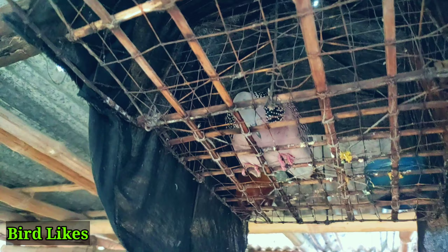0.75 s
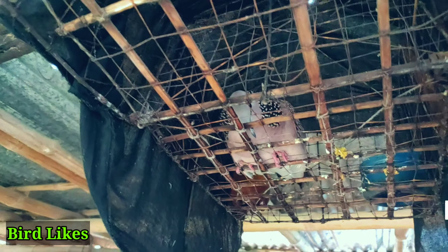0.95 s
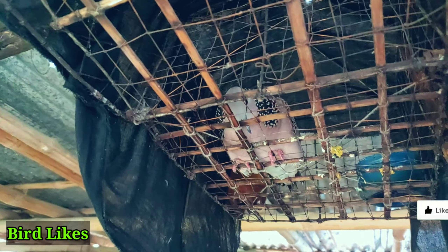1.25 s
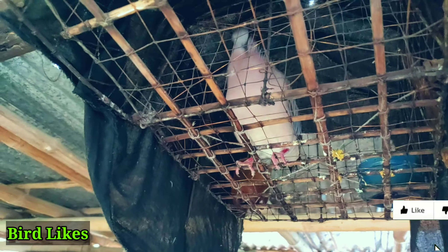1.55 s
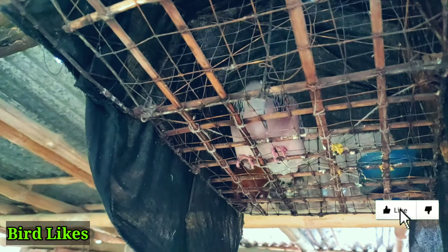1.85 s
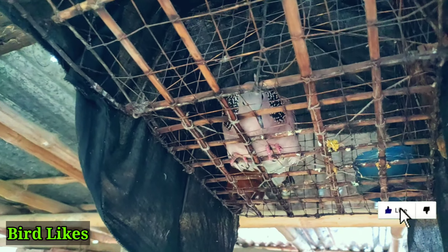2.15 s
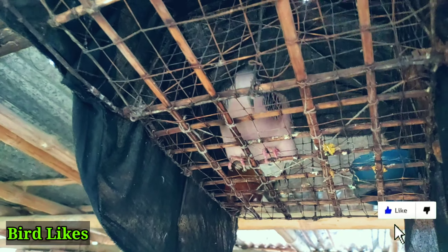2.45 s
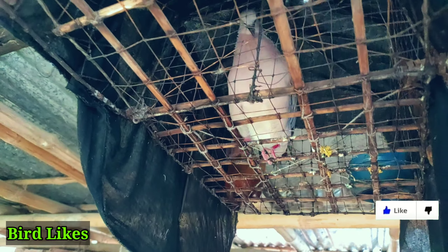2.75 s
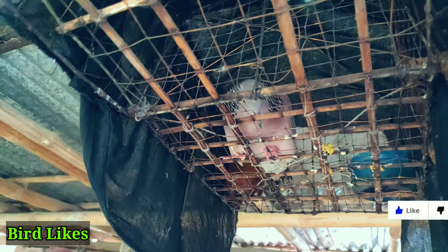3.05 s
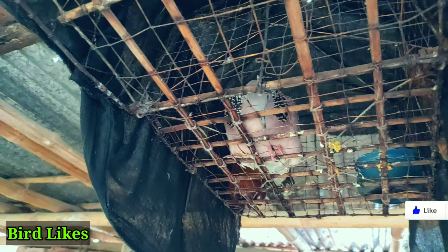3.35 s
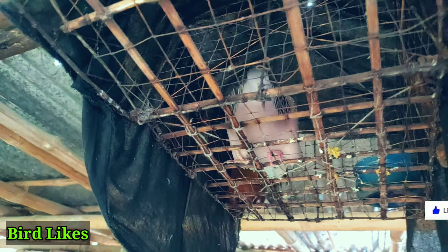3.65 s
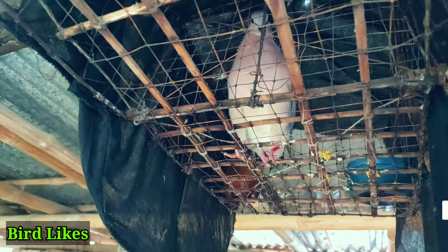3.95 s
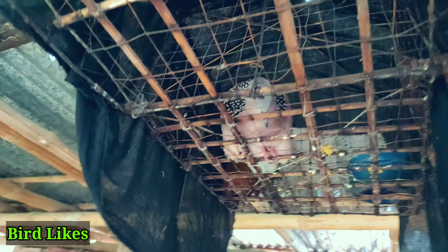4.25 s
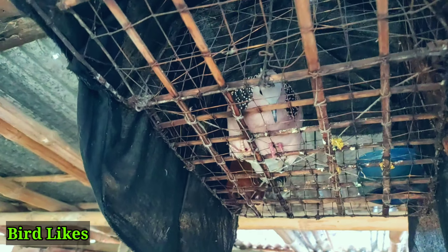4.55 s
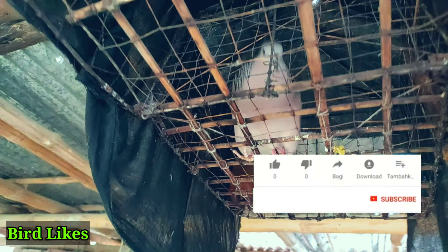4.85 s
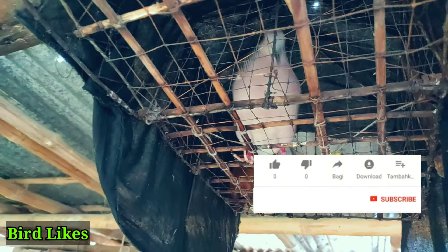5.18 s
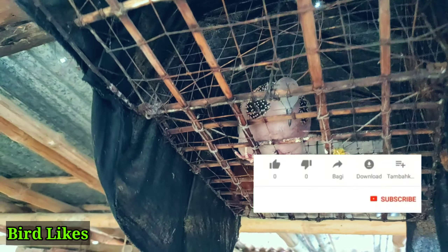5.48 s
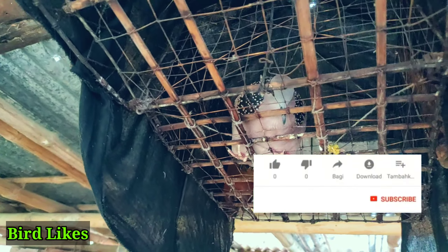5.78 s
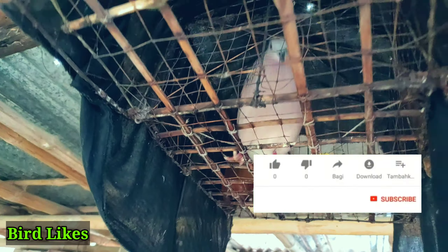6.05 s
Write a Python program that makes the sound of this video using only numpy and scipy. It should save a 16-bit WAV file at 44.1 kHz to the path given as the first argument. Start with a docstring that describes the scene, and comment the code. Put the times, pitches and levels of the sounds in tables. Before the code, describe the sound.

Close, rolling dove coos repeat in a quiet shed while small birds shrill faintly and another dove answers with a throbbing call.

```python
"""Under a shed roof, a caged dove coos seven times, very close. A coo is a rolled "krr", a pulse train
that swells until it overloads the microphone, then a smooth tone that sinks and drops away; the first
is already under way. A second dove answers softly, then with a throbbing, amplitude-modulated call.
Small birds shrill further off, feathers rustle and a mouse button clicks. Roof and walls add
reverberation, and a noise gate lowers the hiss between the coos."""
import sys
import numpy as np
from scipy import signal
from scipy.fft import rfft, irfft, next_fast_len
from scipy.io import wavfile
from scipy.ndimage import uniform_filter1d, minimum_filter1d

SR = 44100
rng = np.random.default_rng(int(sys.argv[2]) if len(sys.argv) > 2 else 0)


def store_pcm(level_fs):
    """Save levels as 16-bit WAV."""
    pcm = np.round(np.clip(level_fs, -1, 1) * 32767).astype(np.int16)
    wavfile.write(sys.argv[1], SR, np.atleast_2d(pcm).T)


N = 353682
TIME = np.arange(N) / SR

# Coos, with delays counted from each start:
# (start [s], first pulse [s], breath eases [s], air runs out [s], level of the soft ending [dB])
COOS = [(-.42, 0.023, 0.52, .722, -22), (.735, 0.033, .55, 0.74, -20.5), (1.892, 0.024, 0.57, 0.71, -18.5),
        (3.067, 0.022, .565, 0.7, -17.5), (4.219, .029, .545, .69, -16), (5.368, 0.018, 0.55, 0.68, -17.5),
        (6.531, .021, .54, 0.67, -16)]
# The opening roll, a push, a lull and a long swell: (delay [s], tone level [dB], pulse crest [dB])
ROLL = [(0, -19.5, -14), (.022, -12.5, -5.5), (.042, -26, -1), (.06, -33.5, -4.5), (.09, -34.5, -16),
        (.135, -36, -20), (.2, -25, -2), (.24, -25, -1), (.275, -10, -1), (.33, -8, -0.5)]
# Strongest pulses, at the climax of the rolls: (time [s], crest [dB])
SURGES = [(0.985, 0), (1.03, 1.5), (1.076, 2.03), (1.11, -0.3), (2.133, 0.57), (2.176, 0.93), (2.213, 2.4),
          (2.238, 0.6), (3.362, 2.1), (3.39, 1.9), (4.5, 1.26), (4.536, 0.83), (4.572, -0.1), (5.636, 0.8),
          (5.677, 0.48), (5.729, 1.56), (6.795, -0.4), (6.884, -0.4)]
# Partials of the coo: (pitch multiple, flutter multiple, level re full voice [dB], growth [dB/dB])
PARTIALS = [(1, 1, -22.5, 0.56), (1, 2, -41, -0.45), (0, 1, -51.5, .4), (0, 2, -58.5, -0.5),
            (2, 0, -33, .15), (2, -1, -48, -0.096), (3, 0, -65, -1), (4, 0, -59, -0.33),
            (9, 0, -68.5, 0.23), (11, 0, -70, 0.38)]
# Husky noise in the throat: (frequency [Hz], relative level [dB])
RASP_SPECTRUM = [(30, -31.5), (120, -18.5), (280, -13.5), (420, 3), (560, 0.5), (700, 11), (820, 4),
                 (950, -11), (1100, -8.5), (1400, -24), (5000, -40.5), (8000, -47.5), (12000, -59.5)]
# The second dove's loud call: (time [s], pitch [Hz], undertone level [dB])
ANSWER = [(7.0, 663, -38), (7.07, 662.5, -16), (7.15, 679.6, -29.5), (7.25, 677.6, -20.5),
          (7.55, 695.6, -27.5), (7.75, 680, -25.5), (7.95, 662.4, -27.5), (8.02, 659, -33.5)]
# Its soft far calls: (start [s], duration [s], first pitch [Hz], target pitch [Hz], level [dB])
FAR_NOTES = [(4.153, 0.15, 621.7, 620, -43), (5.012, 0.5, 680, 852, -37.5),
             (6.038, 0.51, 681.6, 722, -33.5), (6.43, 0.15, 692.6, 643, -35.5)]
# Small birds: (start [s], duration [s], first pitch [Hz], last pitch [Hz], bandwidth [Hz], level [dB])
SHRILLS = [(0.129, 0.23, 3250, 2634, 480, -42.5), (0.549, 0.36, 3300, 3476, 441, -42.5),
           (0.879, 0.33, 3150, 3572, 509, -39.5), (1.061, 0.22, 3500, 3840, 514, -41.5),
           (1.313, 0.37, 3350, 3527, 362, -37), (1.845, 0.32, 2680, 2554, 60, -55.5),
           (2.046, 0.095, 3000, 3030, 80, -60), (2.573, 0.2, 2640, 2540, 140.8, -54.5),
           (3.57, .14, 3250, 2820, 304, -56.5), (4.157, 0.17, 2280, 1992, 307, -49.5),
           (4.314, 0.19, 2440, 2457, 79, -56.5), (4.507, .11, 2700, 2894, 199.3, -52),
           (4.664, 0.11, 2700, 3000, 290, -53), (5.95, .07, 3410, 3300, 695.4, -49.5),
           (7.162, 0.078, 3177, 3055, 814, -52)]
# Feather strokes: (start [s], duration [s], level [dB])
RUSTLES = [(2.903, 0.14, -41.5), (3.52, 0.042, -57.5), (4.735, 0.044, -56), (5.954, 0.039, -44.5),
           (7.305, 1, -64.5)]
# Feather friction: (frequency [Hz], relative level [dB])
RUSTLE_SPECTRUM = [(180, -50), (300, -18), (396, -9.5), (539, -28.5), (574, -3), (723, -9.5), (1560, -9),
                   (3600, -3), (5900, -12.5), (12000, -60), (15600, -91), (22000, -120)]
# Mouse button, down and up: (start [s], duration [s], level [dB])
CLICKS = [(2.282, 0.0058, -27.5), (2.3657, 0.0069, -27.5)]
# The button's snap: (frequency [Hz], relative level [dB])
CLICK_SPECTRUM = [(1200, -32), (2000, -1), (4000, -1.5), (6000, 4.5), (8500, 3), (11000, -9.5), (15500, -9)]
# Faint drone near the end: (start [s], duration [s], pitch [Hz], level [dB])
DRONES = [(7.595, 0.19, 235, -51.5), (7.801, 0.18, 184, -43)]
# Ambient noise of the shed: (frequency [Hz], relative level [dB])
AIR_SPECTRUM = [(25, -34), (55, -21.5), (85, -4), (115, 2.5), (160, -2.5), (300, -9.5), (700, -10),
                (1300, -16.5), (2000, -20), (3400, -22.5), (5800, -25), (8000, -31), (12000, -41.5),
                (16000, -50)]


def dove(full_db=-9, flutter_hz=129, flutter_spread_hz=12, waver=.0016, blur_rad=.043):
    """Modulation: a nearly pure voice with faint flutter sidebands, husky in the roll and at low pitch."""
    hz, tone_db, crest_db = coo_contours()
    phase = phase_of(hz * (1 + waver * drift(31)))
    flutter = phase_of(flutter_hz + flutter_spread_hz * drift(27))
    build_up = np.hanning(SR // 200)   # the voice takes a couple of cycles to build up
    envelope = np.sqrt(2) * np.convolve(from_db(tone_db), build_up / build_up.sum(), "same")
    # partials stand out fully only where the steady tone has taken over from the pulses
    clarity = np.clip(envelope / from_db(np.maximum(crest_db - 1.5, -27)), 0, 1) ** 2
    clarity = np.maximum(clarity, .33 * np.clip(envelope / from_db(-18), 0, 1))
    voice = envelope * np.cos(phase)
    for harmonic, sideband, db, growth in PARTIALS:
        level = from_db(full_db + db + growth * (tone_db - full_db) + (1 + .5 * harmonic) * drift(7.6))
        partial_phase = harmonic * (phase + blur_rad * drift(38)) + sideband * flutter
        voice += np.sqrt(2) * clarity * level * np.cos(partial_phase)
    pulses = roll(hz, phase, envelope, crest_db)
    pulse_power = np.abs(uniform_filter1d(pulses ** 2, SR // 100))
    # the rasp follows the pulse power and rises where the pitch is low
    slack = np.clip((470 - hz) / 70, 0, 1) * np.clip(envelope / from_db(-41.5), 0, 1)
    rasp = (from_db(-28) * pulse_power ** (1 / 4) + from_db(-39) * slack) * noise(RASP_SPECTRUM)
    octave = from_db(-44) * high_pass(pulses ** 2, 700)
    return breath_limit(voice + pulses + rasp) + octave


def coo_contours(roll_hz=576.4, hz_per_db=7, drop_s=.028, drop_hz=85, drop_db=7):
    """Pitch follows effort and drops as the air runs out: curves of pitch, tone level and pulse crest."""
    tone, crests = [], []
    rolled = [(s, roll_hz + hz_per_db * crest, level) for s, level, crest in ROLL]
    onset = [(-.003, rolled[0][1], -88.5)]
    for start, _, ease_s, end_s, soft_db in COOS:
        held = held_tone(ease_s, end_s, soft_db)
        end, hz, db = held[-1]
        drop = [(end + drop_s / 2, hz - drop_hz / 3, db - drop_db / 3),
                (end + drop_s, hz - drop_hz, db - drop_db),
                (end + 2 * drop_s, hz - 2 * drop_hz, -90)]
        tone += [(start + s, pitch, level) for s, pitch, level in onset + rolled + held + drop]
        crests += [(start + s, crest) for s, _, crest in ROLL] + [(start + .5, -60), (start + 1, -60)]
    return curves(tone) + curves(crests)


def held_tone(ease_s, end_s, soft_db, from_s=.37, held_hz=542.6, held_db=-9.5, step_s=.06):
    """Exponential decay, stepping down as the breath eases: (delay [s], pitch [Hz], level [dB])."""
    slow_db_per_s, fast_db_per_s, sag_hz_per_s, hz_per_db = 17, 42, 75, 3.5
    s = np.array([from_s, ease_s, ease_s + step_s, end_s])
    db = np.array([held_db, held_db - slow_db_per_s * (s[1] - s[0]),
                   soft_db, soft_db - fast_db_per_s * (s[3] - s[2])])
    hz = held_hz - sag_hz_per_s * (s - from_s) + hz_per_db * (db - held_db)
    return list(zip(s, hz, db))


def roll(hz, phase, envelope, crest_db, rise_s=.0034, fall_s=.0055, slip_rad=1.6, choke=.45):
    """Phase locking: pulses start sharp and sag in pitch, and lock to the tone once it is strong."""
    lift_hz, push_hz, scatter_hz, sag_hz_per_s, lock_share = 35, 135, 22, 8500, .36
    out = np.zeros(N)
    for s, db in roll_pulses(crest_db):
        i, centre = near(s, .02), int(s * SR)
        t = TIME[i] - s
        tone_share = min(envelope[centre] / from_db(db), 1)
        pulse_hz = hz[centre] + lift_hz + push_hz * tone_share + scatter_hz * rng.standard_normal()
        chirp = 2 * np.pi * (pulse_hz - sag_hz_per_s * t / 2) * t
        offset = phase[centre] + slip_rad * max(1 - tone_share / lock_share, 0) * rng.standard_normal()
        window = np.exp(-(t / np.where(t < 0, rise_s, fall_s)) ** 2)
        out[i] += from_db(db) * (1 - tone_share) * window * np.cos(chirp + offset)
        # the tone is choked for an instant just ahead of the pulse
        out[i] -= choke * envelope[i] * np.exp(-((t + .0058) / .0026) ** 2) * np.cos(phase[i])
    return out


def roll_pulses(crest_db, gaps_s=(.0141, .0093), quicken_s=(.18, .28), surge_gap_s=.019):
    """A pulse train that quickens up to the first surge, then beats slower: (time [s], crest [dB])."""
    jitter_s, scatter_db, ceiling_db = .0004, .65, -.4
    pulses = []
    for start, first_s, *_ in COOS[1:]:
        surges = [row for row in SURGES if start < row[0] < start + .5]
        climax, times = surges[0][0], [start + first_s]
        while times[-1] < climax - gaps_s[1] / 2:
            times.append(times[-1] + np.interp(times[-1] - start, quicken_s, gaps_s))
        # the train runs evenly into the first surge
        times = list(np.interp(times[:-1], (times[0], times[-1]), (times[0], climax)))
        for (previous, _), (s, _) in zip(surges, surges[1:]):
            beats = max(round((s - previous) / surge_gap_s), 1)
            times += list(np.linspace(previous, s, beats + 1)[1:-1])
        for s, (late, louder) in zip(times, rng.standard_normal(size=(40, 2))):
            db = min(crest_db[int(s * SR)] + scatter_db * louder, ceiling_db)
            pulses.append((s + jitter_s * late, db))
        pulses += surges
    return pulses


def breath_limit(voice, ceiling_db=-.66, surge_s=.006):
    """Amplitude limiting: the voice is held to a ceiling that lifts only in the surges."""
    reach_db = np.full(N, ceiling_db, float)
    for s, db in SURGES:
        i = near(s, 3 * surge_s)
        reach_db[i] += max(db - ceiling_db, 0) * np.exp(-((TIME[i] - s) / surge_s) ** 4)
    envelope = np.abs(signal.hilbert(voice, next_fast_len(N)))[:N]
    gain = minimum_filter1d(np.minimum(from_db(reach_db) / (envelope + 1e-9), 1), SR // 400)
    return voice * uniform_filter1d(uniform_filter1d(gain, SR // 500), SR // 500)


def gulps(delay_s=.043, length_s=.013, hz=835, db=-41):
    """A transient in the throat: a tiny, dull tick once the air has run out."""
    ticks = sum(swell(start + end_s + delay_s, length_s, skew=.6) for start, _, _, end_s, _ in COOS)
    return from_db(db) * ticks * noise_band(2 * np.pi * hz * TIME, width_hz=350)


def second_dove(throat_hz=(520, 950), rough_lift_hz=25, scatter_hz=8, slip_rad=.6):
    """Source and filter: far calls, then throbs over a rough undertone, pass the throat's one band."""
    hz, under_db = curves([(ANSWER[0][0] - .05, ANSWER[0][1], -120), *ANSWER])
    phase = phase_of(hz)
    roughness = noise_band(phase_of(hz + rough_lift_hz), width_hz=125)
    call = from_db(under_db) * (.5 * np.cos(phase) + .8 * roughness)
    for (s, db, length), (detune, offset) in zip(throbs(), rng.standard_normal(size=(30, 2))):
        i = near(s, 2 * length)
        t = TIME[i] - s
        throb_phase = phase[i] + 2 * np.pi * scatter_hz * detune * t + slip_rad * offset
        call[i] += from_db(db) * np.exp(-(t / (.62 * length)) ** 2) * np.cos(throb_phase)
    call = signal.sosfilt(signal.butter(2, throat_hz, "band", fs=SR, output="sos"), call + far_calls())
    calling = np.clip(from_db(under_db + 29), 0, 1)
    overtones = sum(noise_band(k * phase, width_hz=55) * 2 / k for k in (2, 3))
    octave = from_db(-38) * high_pass(call ** 2, 900)
    return call + octave + from_db(-59) * calling * overtones


def throbs(start_s=7.23, end_s=7.972, fast_gap_s=.023, last_gap_s=.07385, duty=.61):
    """Amplitude modulation that ends slower, louder and more even: (time [s], crest [dB], length [s])."""
    crest_db, slow_gain_db, scatter_db, jitter_s = -14, 5, 3, .005
    slowness = .65 ** np.arange(30)   # counted back from the last throb
    gaps = fast_gap_s + (last_gap_s - fast_gap_s) * slowness
    late, louder = (1 - slowness) * rng.standard_normal((2, len(gaps)))
    times = end_s - np.cumsum(gaps) + gaps + jitter_s * late
    crests = crest_db + slow_gain_db * slowness + scatter_db * louder
    return [row for row in zip(times, crests, duty * gaps) if row[0] > start_s]


def far_calls(ramp_s=.011, fade_db_per_s=34, glide_s=.1):
    """Exponential glide and decay: soft notes in a haze of noise slide towards a pitch and die away."""
    out = np.zeros(N)
    for s, length, first_hz, target_hz, db in FAR_NOTES:
        i = near(s + length / 2, length / 2)
        t = TIME[i] - s
        level = from_db(db - fade_db_per_s * t) * np.clip(np.minimum(t, length - t) / ramp_s, 0, 1)
        phase = phase_of(target_hz + (first_hz - target_hz) * np.exp(-t / glide_s))
        out[i] += level * (.87 * np.cos(phase) + .8 * noise_band(phase, width_hz=190))
    return out


def small_birds(skew=.75):
    """Bandwidth sets timbre: wide gliding bands are harsh cries, narrow ones thin whistles."""
    out = np.zeros(N)
    for s, length, first_hz, last_hz, width_hz, db in SHRILLS:
        i = near(s + length / 2, length / 2)
        arch = np.sin(np.pi * np.linspace(0, 1, len(i)) ** skew)
        glide = phase_of(np.linspace(first_hz, last_hz, len(i)))
        out[i] += from_db(db) * arch * noise_band(glide, width_hz)
    return out


def feathers(grain_db=3):
    """Friction noise: feathers brush in grainy strokes."""
    strokes = sum(from_db(db) * swell(s, length, skew=.6) for s, length, db in RUSTLES)
    return strokes * noise(RUSTLE_SPECTRUM) * from_db(grain_db * drift(200))


def mouse_button():
    """Broadband transients: the button snaps down and up."""
    snaps = sum(from_db(db) * swell(s, length, skew=.18) for s, length, db in CLICKS)
    return snaps * noise(CLICK_SPECTRUM)


def low_drone(width_hz=30):
    """Narrowband noise, heard as a low tone in two soft swells."""
    return sum(from_db(db) * swell(s, length, skew=.79) * noise_band(2 * np.pi * hz * TIME, width_hz)
               for s, length, hz, db in DRONES)


def shed_echoes(x, t60_s, dull_hz, delay_s=.012):
    """Reverberation: diffuse reflections from roof and walls decay exponentially."""
    t = np.arange(SR) / SR
    tail = rng.standard_normal(SR) * from_db(-60 * t / t60_s) * (t > delay_s)
    tail /= np.sqrt(np.sum(tail ** 2))
    tail = signal.sosfilt(signal.butter(1, dull_hz, fs=SR, output="sos"), tail)
    return signal.fftconvolve(x, tail)[:N]


def shed_air(hum_hz=112):
    """The noise floor: a broadband hiss and a wavering hum."""
    hiss = from_db(-55.5) * noise(AIR_SPECTRUM)
    return hiss + from_db(-59.5) * noise_band(phase_of(np.full(N, hum_hz)), width_hz=17)


def noise_gate(x, shut_db=-54, open_db=-38, depth_db=18, release_db_per_s=150):
    """Downward expansion: the gain rises at once with a loud sound and sinks slowly after it."""
    level_db = 10 * np.log10(np.abs(uniform_filter1d(x ** 2, SR // 120)) + 1e-12)
    release_db = release_db_per_s * TIME
    held_db = np.maximum.accumulate(level_db + release_db, axis=-1) - release_db
    return x * from_db(-depth_db * np.clip((open_db - held_db) / (open_db - shut_db), 0, 1))


def from_db(db):
    """Amplitude ratio of a level in decibels."""
    return 10 ** (np.asarray(db) / 20)


def unit_power(x):
    """Normalisation to a mean square of one."""
    return x / np.sqrt(np.mean(x ** 2) + 1e-20)


def curves(rows):
    """Linear interpolation over time, one curve per value column."""
    s, *columns = np.transpose(sorted(map(tuple, rows)))
    return [np.interp(TIME, s, column) for column in columns]


def phase_of(hz):
    """Phase as the integral of frequency."""
    return 2 * np.pi * np.cumsum(hz) / SR


def drift(hz, count=N):
    """Random fluctuation: low-passed noise of unit power."""
    white = rng.standard_normal(count + SR)
    return unit_power(signal.sosfilt(signal.butter(2, hz, fs=SR, output="sos"), white)[SR:])


def noise_band(phase, width_hz):
    """Random quadrature modulation spreads a tone into a band."""
    in_phase, quadrature = drift(width_hz / 2, len(phase)), drift(width_hz / 2, len(phase))
    return (in_phase * np.cos(phase) + quadrature * np.sin(phase)) / np.sqrt(2)


def noise(spectrum):
    """Spectral shaping of white noise, at unit power."""
    hz, db = np.transpose(spectrum)
    size = next_fast_len(N)
    bins_hz = np.maximum(np.fft.rfftfreq(size, 1 / SR), 1)
    gain = from_db(np.interp(np.log(bins_hz), np.log(hz), db))
    return unit_power(irfft(rfft(rng.standard_normal(size)) * gain, size)[:N])


def swell(s, length, skew):
    """An arched envelope; a skew under 1 brings its top forward."""
    return np.sin(np.pi * np.clip((TIME - s) / length, 0, 1) ** skew)


def near(s, reach_s):
    """A time window: sample indices around a moment."""
    return np.arange(*np.clip([int((s - reach_s) * SR), int((s + reach_s) * SR)], 0, N))


def high_pass(x, hz):
    """Fourth-order attenuation of the low frequencies."""
    return signal.sosfilt(signal.butter(4, hz, "high", fs=SR, output="sos"), x)


def scene():
    """Superposition: the doves are mostly direct sound; small birds and feathers reverberate more."""
    doves = dove() + gulps() + second_dove()
    others = small_birds() + feathers()
    echoes = from_db(-18.5) * shed_echoes(doves, t60_s=.42, dull_hz=3000)
    echoes += from_db(-4) * shed_echoes(others, t60_s=.5, dull_hz=7000)
    return (doves + others + echoes + shed_air() + low_drone() + mouse_button())[None]


def record(dry, fade_in_s=.001, cutoff_hz=15700):
    """Overload: after the noise gate the loudest pulses clip, and a low-pass cuts off the top."""
    gated = noise_gate(dry) * np.minimum(TIME / fade_in_s, 1)
    clipped = np.clip(gated, -1, 1)
    return signal.sosfilt(signal.ellip(10, .1, 80, cutoff_hz, fs=SR, output="sos"), clipped)


dry = scene()
out = record(dry)
store_pcm(out)
```